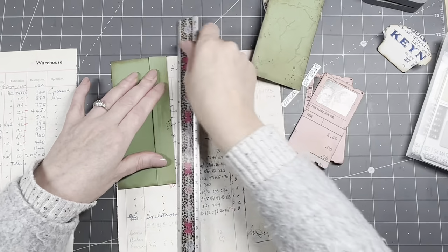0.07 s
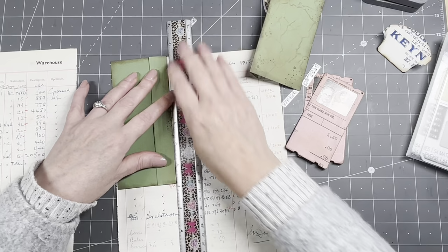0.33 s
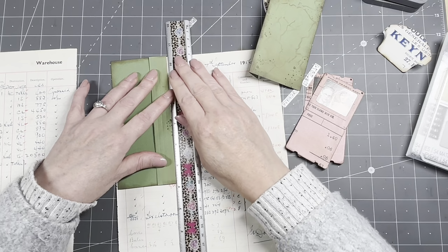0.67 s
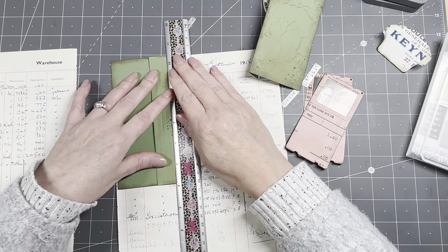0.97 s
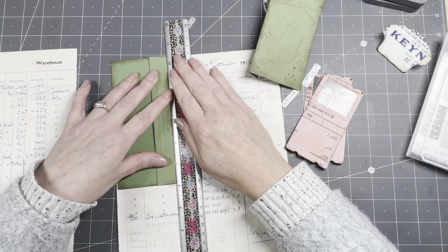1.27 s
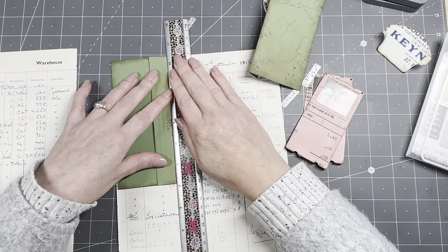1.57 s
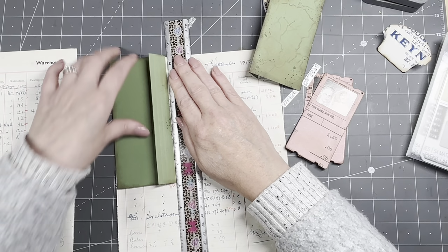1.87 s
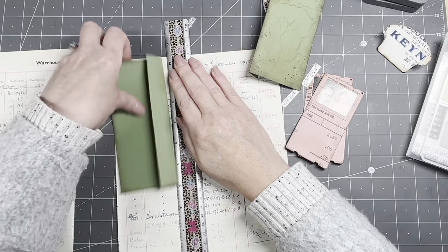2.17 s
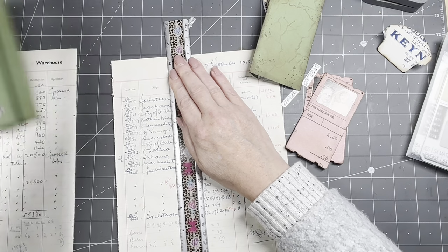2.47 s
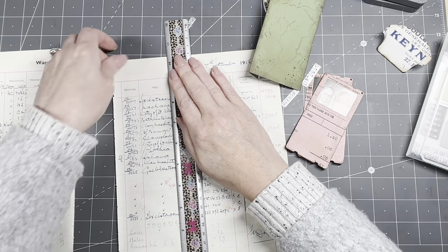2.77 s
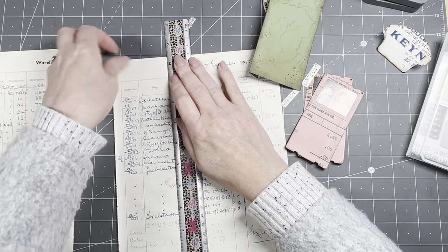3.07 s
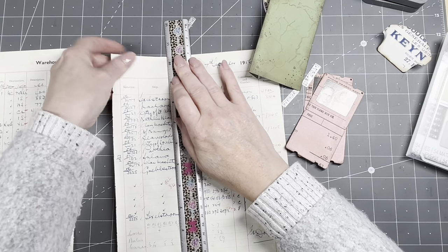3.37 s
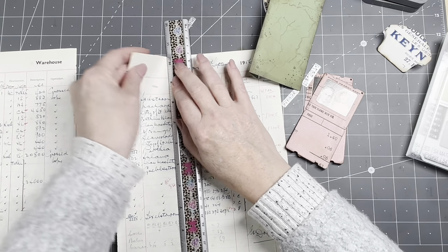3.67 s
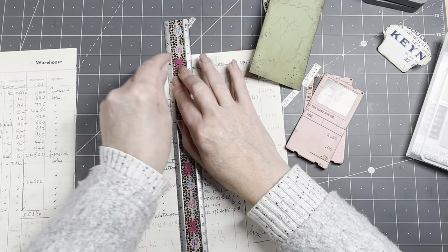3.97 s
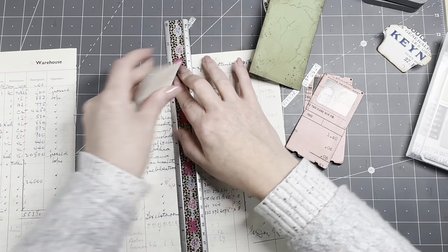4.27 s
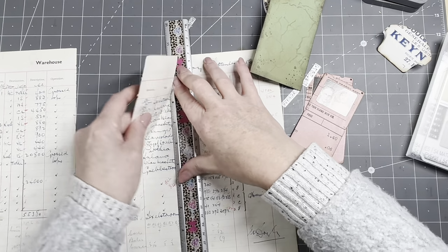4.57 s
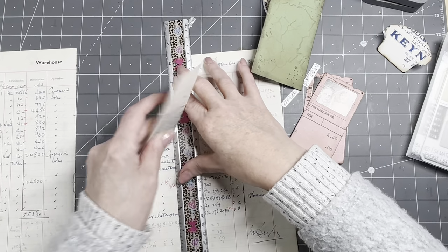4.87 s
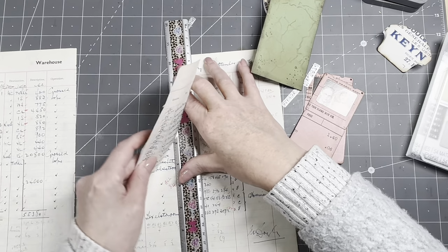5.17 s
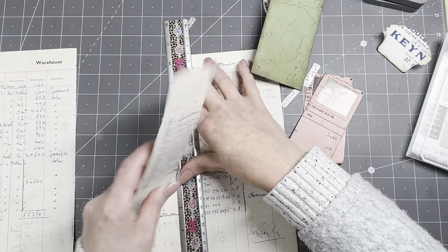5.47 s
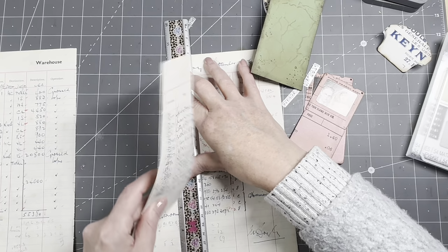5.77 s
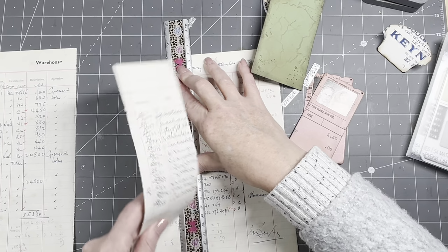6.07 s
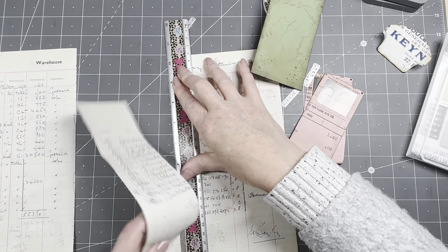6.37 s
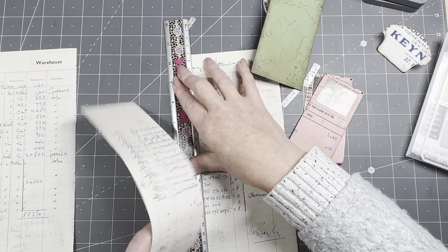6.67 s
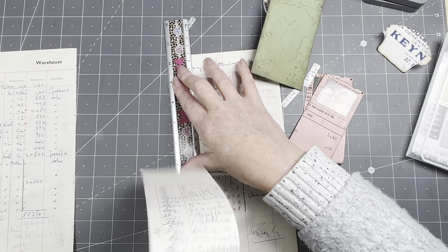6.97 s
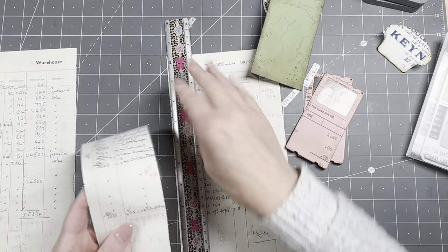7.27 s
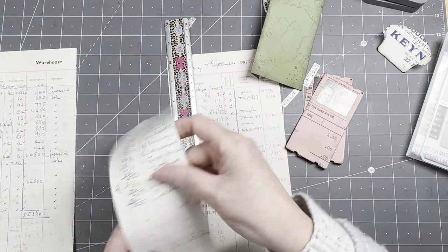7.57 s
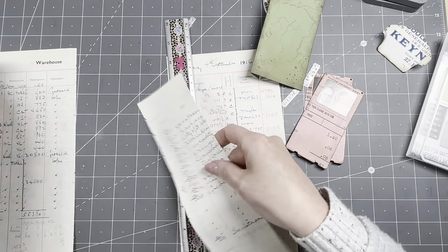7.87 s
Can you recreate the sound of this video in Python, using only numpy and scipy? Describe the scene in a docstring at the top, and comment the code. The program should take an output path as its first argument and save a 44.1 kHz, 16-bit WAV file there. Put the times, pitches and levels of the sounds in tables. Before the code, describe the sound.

Close above a craft desk in a quiet little room, a ruler lands on paper with a few sharp clacks. Light rubbing and dull bumps follow as a folder is moved aside. From about halfway, stiff paper rips in seven brief tugs, each a dense, fizzy crackle, with small snaps as the sheet buckles. It ends with the freed strip being handled: crinkles, tiny squeaks and light taps.

```python
"""A craft desk in a small, quiet room, heard through two close microphone ports above it.
A metal ruler is laid on old paper and a card folder is slid away: knocks, friction hiss, rustle.
A strip is torn off along the ruler in seven short pulls: fibres break in dense crackle,
the stiff sheet buckles with snaps and the desk drums. The strip is lifted and turned over."""
import sys
import numpy as np
from scipy import signal
from scipy.fft import rfft, irfft, next_fast_len
from scipy.io import wavfile
from scipy.ndimage import uniform_filter1d

SR = 44100
rng = np.random.default_rng(int(sys.argv[2]) if len(sys.argv) > 2 else 0)


def wav_out(sig):
    """Save sig, one row per channel (or a flat mono array), as 16-bit PCM at SR to the path in sys.argv[1]."""
    wavfile.write(sys.argv[1], SR, np.round(np.clip(np.atleast_2d(sig).T, -1, 1) * 32767).astype(np.int16))


N = 357651
TIME = np.arange(N) / SR
TAPS = 4096
HZ = np.fft.rfftfreq(TAPS, 1 / SR)


def amp(db):
    """Decibels to gain."""
    return 10 ** (np.asarray(db) / 20)


def decay(t, t60_s):
    """Gain falling 60 dB per t60_s."""
    return amp(-60 * t / t60_s)


def unit(x):
    """Scale to rms 1."""
    return x / np.sqrt(np.mean(x ** 2) + 1e-20)


def struck(x, span_s):
    """Scale a blow to the energy of rms 1 held for span_s."""
    return x / np.sqrt(np.sum(x ** 2) / (span_s * SR) + 1e-20)


def curve(points, hz=HZ):
    """Interpolate (frequency, value) points on a log-frequency axis."""
    point_hz, value = np.transpose(points)
    return np.interp(np.log(hz + 1), np.log(point_hz + 1), value)


def hump_db(centre_hz, db_per_octave):
    """Spectrum falling away on both sides of centre_hz."""
    return -db_per_octave * abs(np.log2((HZ + 1) / centre_hz))


def add(mix, start_s, sound):
    """Mix a sound in at start_s."""
    part = mix[max(round(start_s * SR), 0):][:len(sound)]
    part += sound[:len(part)]


def colour(x, shape_db):
    """Minimum-phase filter: rings after a click, never before."""
    log_gain = np.log(amp(np.maximum(shape_db, -100)))
    mirrored = np.concatenate([log_gain, log_gain[-2:0:-1]])
    spectrum = np.exp(np.conj(signal.hilbert(mirrored)))[:len(HZ)]
    return signal.oaconvolve(x, irfft(spectrum))[:len(x)]


def wander(rate_hz):
    """Smooth noise up to about rate_hz, rms 1."""
    hz = np.fft.rfftfreq(N, 1 / SR)
    return unit(irfft(rfft(rng.standard_normal(N)) / (1 + (hz / rate_hz) ** 4), N))


def crackle(per_s, spread_db):
    """Randomly timed clicks, mostly small, a few large."""
    size = amp(spread_db * np.minimum(rng.exponential(1, N), 4))
    polarity = rng.choice([-1., 1.], N)
    return unit(size * polarity * (rng.random(N) < per_s / SR))


def burst(t, t60_s, shape_db):
    """Dying cluster of contacts, coloured by what it strikes."""
    return colour(rng.standard_normal(len(t)) * decay(t, t60_s), shape_db)


def flexing(x, depth_db, hold_s):
    """Shifting resonances of a bending sheet; output rms 1."""
    _, frame_s, spectra = signal.stft(x, SR, nperseg=512, noverlap=384)
    hold_frames = max(int(hold_s / frame_s[1]), 1)
    ripple = uniform_filter1d(rng.standard_normal(spectra.shape), size=4, axis=0)
    ripple = unit(uniform_filter1d(ripple, hold_frames, axis=1))
    _, flexed = signal.istft(spectra * amp(depth_db * ripple), SR, nperseg=512, noverlap=384)
    return unit(flexed[:N])


def stroke(length_s, rise_s, t60_s, swell_db, bite=0):
    """Speed of a hand movement: rises from the fraction bite, swells or fades, runs out."""
    t = np.arange(0, length_s + t60_s, 1 / SR)
    rise = bite + (1 - bite) * np.minimum(t / rise_s, 1)
    swell = amp(swell_db * (np.minimum(t / length_s, 1) - .5))
    return rise * swell * decay(np.maximum(t - length_s, 0), t60_s)


# Room air spectrum: (frequency [Hz], gain [dB])
AIR_SPECTRUM = [(20, -21), (50, 4), (90, -4), (130, -10.5), (220, -13), (500, -22.5), (1200, -30.5),
                (2500, -32), (6000, -39), (15000, -48.5)]
# Each port's own air against the shared part: (frequency [Hz], gain [dB])
AIR_PER_PORT = [(100, -15), (500, -10), (3000, -3)]


def air(level_db=-70):
    """Low building murmur shared by both ports, and faint hiss that differs between them."""
    shared, left, right = rng.standard_normal((3, N))
    ports = [shared + colour(own, curve(AIR_PER_PORT)) for own in (left, right)]
    return amp(level_db) * unit(np.array([colour(port, curve(AIR_SPECTRUM)) for port in ports]))


# Room decay: (frequency [Hz], t60 [s])
ROOM_T60 = [(100, 0.27), (500, 0.37), (2000, 0.19), (6000, 0.23), (15000, 0.022)]


def room(x, level_db=-16, delay_s=0.008):
    """Short tail of the small room at one port."""
    t = np.arange(SR // 2) / SR
    hz, frame_s, spectra = signal.stft(rng.standard_normal(len(t)) * (t > delay_s), SR, nperseg=256)
    spectra *= decay(frame_s, curve(ROOM_T60, hz)[:, None])
    tail = signal.istft(spectra, SR, nperseg=256)[1][:len(t)]
    return amp(level_db) * signal.oaconvolve(x, tail / np.linalg.norm(tail))[:N]


# Near echo spectrum: (frequency [Hz], gain [dB])
ECHO_SPECTRUM = [(100, -15.5), (400, -4.5), (850, 2), (2000, -3), (4500, 3.5), (7500, -7), (15000, -25.5)]


def reflections(x, t60_s=0.028, delay_s=0.0004, hop=4096):
    """Changing echoes off moving hands, strip and desk things, plus their room tail."""
    t = np.arange(SR // 20) / SR
    window = np.sin(np.pi * np.arange(2 * hop) / (2 * hop))
    echoes = np.zeros(N)
    for start in range(0, N, hop):
        piece = x[start:start + 2 * hop]
        taps = rng.standard_normal(len(t)) * decay(t, t60_s) * (t > delay_s)
        taps /= np.linalg.norm(taps)
        add(echoes, start / SR, signal.fftconvolve(piece * window[:len(piece)], taps))
    return colour(echoes, curve(ECHO_SPECTRUM)) + room(echoes)


# Paper squeaks: (time [s], length [s], start pitch [Hz], end pitch [Hz], level [dB])
SQUEAKS = [(1.678, 0.043, 1390, 1220, -67), (2.503, 0.017, 1230, 1180, -52),
           (2.542, 0.032, 1250, 1210, -61), (7.523, 0.016, 740, 646, -56.5),
           (7.559, 0.027, 770, 590, -50.5), (7.687, 0.034, 870, 1100, -51.5)]


def squeaks(width_hz=600):
    """Paper sticks and slips, driving one gliding resonance of the sheet."""
    out = np.zeros(N)
    pole = np.exp(-np.pi * width_hz / SR)
    for start_s, length_s, start_hz, end_hz, level_db in SQUEAKS:
        hz = np.linspace(start_hz, end_hz, round(length_s * SR))
        carrier = np.exp(2j * np.pi * np.cumsum(hz) / SR)
        slips = rng.standard_normal(SR // 4)[:len(hz)]
        ring = (carrier * signal.lfilter([1], np.poly([pole, pole]), slips / carrier)).real
        add(out, start_s, amp(level_db) * unit(ring * signal.windows.tukey(len(hz), .5)))
    return out


# Desk top response: (frequency [Hz], gain [dB])
DESK_SPECTRUM = [(25, -43.5), (60, -5.5), (100, -8), (130, 3), (160, -9), (250, -10.5), (400, -16.5),
                 (900, -29), (3000, -64)]


def desk_rumble(drive):
    """Low response of the desk top to a force, rms 1."""
    return unit(colour(drive, curve(DESK_SPECTRUM)))


def desk_thump(t, mode_hz=130, mode_t60_s=0.12, thud_t60_s=0.16):
    """A blow excites the desk's lowest mode and a dull thud."""
    mode = unit(np.sin(2 * np.pi * mode_hz * t) * decay(t, mode_t60_s))
    thud = desk_rumble(rng.standard_normal(len(t)) * decay(t, thud_t60_s))
    return struck(mode + thud, span_s=0.028)


# How freely the strip hangs: (time [s], freedom [0-1])
STRIP_FREEDOM = [(4.0, 0.03), (4.7, 0.37), (5.3, 0.33), (6.0, 0.93)]


def strip(drive, held_db, free_db):
    """The strip's spectrum fades from held to free as it comes loose."""
    freedom = np.interp(TIME, *np.transpose(STRIP_FREEDOM))
    return (1 - freedom) * unit(colour(drive, held_db)) + freedom * unit(colour(drive, free_db))


# Hand, ruler, folder or strip on paper: (time [s], length [s], rustle [dB], hiss [dB], swell [dB])
RUB_STROKES = [(0.0, 0.049, -39.5, -45.5, -34.5), (0.051, 0.067, -48, -46.5, 3),
               (0.133, 0.018, -47.5, -41, 4.5), (0.153, 0.27, -74, -68, -25), (0.378, 0.036, -65, -63, -3),
               (0.637, 0.11, -86, -80, -3.5), (0.86, 0.14, -93.5, -86, 5), (1.562, 0.13, -81.5, -56, 12),
               (1.843, 0.15, -57, -59, -13.5), (1.994, 0.08, -85, -66.5, 0), (2.131, 0.1, -78, -48.5, -9),
               (2.097, 0.29, -61, -57, 1.5), (2.394, 0.027, -64, -53.5, 0), (2.464, 0.051, -62, -55.5, 1),
               (2.52, 0.036, -49, -54, -1), (2.74, 0.028, -80, -70, -2), (2.975, 0.04, -60, -63, 6),
               (3.139, 0.15, -66, -56.5, -6.5), (3.238, 0.018, -67, -39, 1), (3.313, 0.3, -66, -61, 7.5),
               (3.434, 0.024, -75, -48.5, -3), (3.565, 0.15, -68, -67, -10),
               (4.121, 0.32, -61.5, -62.5, 12), (4.453, 0.12, -72.5, -74, 5), (4.81, 0.15, -64.5, -65, 3),
               (4.902, 0.19, -62, -56.5, 1.5), (5.367, 0.24, -63, -62.5, 17), (5.77, 1.254, -62, -62.5, 1),
               (7.102, 0.085, -65, -59, 16), (7.197, 0.22, -64, -58, -10),
               (7.441, 0.078, -53.5, -50.5, 1.5), (7.553, 0.076, -53.5, -51, 3),
               (7.68, 0.17, -70.5, -73, -20), (7.827, 0.048, -63, -64, 11), (7.965, 0.096, -50.5, -56, 0.5)]


def rub_gains(sleeves_from_s=1.85, sleeves_db=(-79, -79.5), settle_db=-17.5, settle_t60_s=0.3):
    """Rustle and hiss gains: sleeves, rubs and the sheet settling after blows add in power."""
    rustle_power, hiss_power = (amp(db) ** 2 * (TIME > sleeves_from_s) for db in sleeves_db)
    for start_s, length_s, rustle_db, hiss_db, swell_db in RUB_STROKES:
        speed = stroke(length_s, rise_s=0.02, t60_s=0.11, swell_db=swell_db)
        add(rustle_power, start_s, (amp(rustle_db) * speed) ** 2)
        add(hiss_power, start_s, (amp(hiss_db) * speed) ** 2)
    settling = amp(settle_db) * decay(np.arange(SR // 3) / SR, settle_t60_s)
    for start_s, _, blow_db, *_ in DESK_KNOCKS + SHEET_SNAPS:
        add(rustle_power, start_s, (amp(blow_db) * settling) ** 2)
    return np.sqrt(rustle_power), np.sqrt(hiss_power)


# Paper rustle, its change on a free strip, friction hiss: (frequency [Hz], gain [dB])
RUSTLE_SPECTRUM = [(30, -15), (120, -7.5), (300, 0.5), (700, -1.5), (1200, -0.5), (2200, -0.5),
                   (3500, -1.5), (8000, -36.5)]
FREE_STRIP_EQ = [(150, -4.5), (300, -5), (600, 6.5), (1000, 0), (2000, 4.5), (4000, 0)]
HISS_SPECTRUM = [(500, -24.5), (2000, -12), (3600, -3), (5500, 1), (7500, 0), (10000, -4.5), (13000, 2),
                 (15500, -7)]


def rubbing(desk_db=-7, grip_db=2.1, tick_db=-9):
    """Paper on paper and skin: friction hiss, crinkles, stray ticks and desk rumble."""
    grip = unit(amp(grip_db * wander(rate_hz=34)))
    rustle_gain, hiss_gain = rub_gains()
    crinkles = crackle(per_s=1500, spread_db=3) + amp(tick_db) * crackle(per_s=40, spread_db=2.5)
    flat_db = curve(RUSTLE_SPECTRUM)
    rustle = strip(crinkles, held_db=flat_db, free_db=flat_db + curve(FREE_STRIP_EQ))
    rustle = flexing(rustle, depth_db=3.5, hold_s=0.051)
    friction = crackle(per_s=20000, spread_db=3.5) + 0.13 * crinkles
    hiss = unit(colour(friction, curve(HISS_SPECTRUM)))
    rumble = amp(desk_db) * desk_rumble(rng.standard_normal(N))
    return grip * (rustle_gain * (rustle + rumble) + hiss_gain * hiss)


# Crack spectrum: (frequency [Hz], gain [dB])
CRACK_SPECTRUM = [(300, -27), (1500, -19.5), (3800, 2), (5500, 1), (8000, -0.5), (12000, -1.5), (15500, -6)]


def crack(t, t60_s, shelf_db, shelf_hz=8000):
    """Bright onset of a knock or snap, with a treble shelf."""
    shelf = HZ ** 4 / (HZ ** 4 + shelf_hz ** 4)
    return struck(burst(t, t60_s, curve(CRACK_SPECTRUM) + shelf_db * shelf), span_s=0.0073)


# Ruler, folder, fingers and strip hit the desk:
# (time [s], centre [Hz], clack [dB], tick [dB], thump before trim [dB], tick shelf [dB])
DESK_KNOCKS = [(0.008, 1340, -38.5, -39, -41, -18), (0.131, 2950, -32, -24, -63, 14),
               (0.1336, 1900, -36.5, -32, -40, -4), (0.2385, 920, -50, -42.5, -51.5, 5),
               (0.3765, 1760, -65, -56, -57.5, 6.5), (0.6479, 2390, -66, -68.5, -84, 3),
               (1.847, 365, -56.5, -47.5, -53, -16), (1.859, 348, -47.5, -46.5, -41.5, -11),
               (1.926, 357, -44.5, -52.5, -42, -10), (1.9608, 356, -54, -55, -40, -27),
               (2.086, 4500, -47.5, -43.5, -50, -5), (2.179, 463, -52.5, -66, -85, 9),
               (2.497, 1100, -43.5, -42.5, -58, 11), (2.6849, 363, -48.5, -56, -51, -1),
               (2.798, 355, -55, -60.5, -54.5, -6), (2.903, 890, -52, -62, -60, -8),
               (3.132, 2000, -63, -49, -61, 33), (3.351, 1200, -57.5, -56.5, -68, -2),
               (3.501, 1210, -59, -65, -68, -10), (4.227, 494, -60, -75, -57, -1),
               (4.5661, 364, -42, -59, -66, 9), (4.985, 1300, -54, -64, -66, 1),
               (5.085, 1970, -58.5, -59, -56, 19), (6.823, 745, -39.5, -65, -44, -10),
               (7.455, 890, -55, -58, -63, 14), (7.5528, 3150, -43.5, -45, -53, 1),
               (7.652, 620, -55, -70, -76, -10), (7.9635, 2900, -39.5, -43.5, -53.5, -12),
               (7.9963, 1070, -40, -47, -47, -10), (8.045, 1240, -46, -51, -56, -15)]


def knocks(thump_trim_db=-1):
    """Flat things land on the cutting mat: damped clack, tick and desk thump."""
    out, t = np.zeros(N), np.arange(SR // 5) / SR
    for start_s, centre_hz, clack_db, tick_db, thump_db, shelf_db in DESK_KNOCKS:
        shape_db = curve(RUSTLE_SPECTRUM) + hump_db(centre_hz, db_per_octave=5)
        clack = amp(clack_db) * struck(burst(t, t60_s=0.043, shape_db=shape_db), span_s=0.01)
        tick = amp(tick_db) * crack(t, t60_s=0.031, shelf_db=shelf_db)
        thump = amp(thump_db + thump_trim_db) * desk_thump(t)
        add(out, start_s, clack + tick + thump)
    return out


# Radiating sheet: (frequency [Hz], gain [dB])
SHEET_SPECTRUM = [(30, -24.5), (100, -28.5), (200, -8.5), (330, -11), (600, 0.5), (850, -4.5), (1250, -0.5),
                  (2000, -2.5), (3000, -3.5), (4500, -22), (9000, -35.5)]
# The sheet buckles or a tough bundle gives way:
# (time [s], mid-glide pitch [Hz], ring [dB], crack [dB], crack shelf [dB])
SHEET_SNAPS = [(0.2027, 1590, -43.5, -55, -5), (0.214, 1600, -45, -53, 1), (2.8455, 975, -56.5, -36, 36),
               (3.8608, 1120, -43, -61, -29), (3.9168, 2100, -30, -27.5, -23),
               (4.3123, 1873, -54.5, -60, -7), (4.685, 1190, -43, -37, 28), (5.345, 1660, -45, -52, 0),
               (5.7357, 1760, -31.5, -30, -18.5), (5.8726, 2430, -44.5, -75, -11),
               (6.1014, 1450, -33, -52, 6), (6.247, 1020, -71, -51, 2), (6.342, 1320, -48.5, -48, 11),
               (6.421, 1360, -41, -61, 1), (6.667, 2010, -46, -66, -11), (6.7276, 2280, -48, -44, 0),
               (6.76, 2600, -37.5, -63, -4), (6.813, 1980, -41, -43, -7), (6.932, 2900, -56, -46.5, 0),
               (6.9881, 1530, -40.5, -56, -24), (7.565, 1130, -47, -51, 2), (7.6196, 650, -36.5, -38, -36),
               (7.629, 2110, -39, -55, -3)]


def snaps(ring_t60_s=0.0095, sag=0.16, sag_s=0.00095, thump_db=-23):
    """A paper patch flips: a crack and a short ring that sinks as the tension goes."""
    out, t = np.zeros(N), np.arange(SR // 5) / SR
    glide = 1 + sag * (2 * np.exp(-t / sag_s) - 1)
    for start_s, pitch_hz, ring_db, crack_db, shelf_db in SHEET_SNAPS:
        cycles = np.cumsum(pitch_hz * glide) / SR
        patch = unit(np.sin(2 * np.pi * cycles) * decay(t, ring_t60_s))
        shape_db = curve(SHEET_SPECTRUM) + hump_db(pitch_hz, db_per_octave=4)
        flutter = unit(burst(t, t60_s=0.019, shape_db=shape_db))
        ring = amp(ring_db) * struck(patch + 0.64 * flutter, span_s=0.014)
        onset = amp(crack_db) * crack(t, t60_s=0.0039, shelf_db=shelf_db)
        thump = amp(ring_db + thump_db) * desk_thump(t)
        add(out, start_s, ring + onset + thump)
    return out


# Pulls on the strip: (time [s], length [s], speed rise [s], speed t60 [s], speed swell [dB],
# sheet [dB], fizz [dB], desk before trim [dB])
TEAR_PULLS = [(3.905, 0.2, 0.099, 0.15, -1.5, -40, -39.5, -46),
              (4.581, 0.21, 0.053, 0.14, 2.5, -39.5, -43, -54), (5.133, 0.22, 0.066, 0.1, 4, -42, -43, -58),
              (5.625, 0.15, 0.12, 0.14, 1.5, -39, -42, -53),
              (5.993, 0.13, 0.073, 0.1, -0.5, -36.5, -40, -49),
              (6.34, 0.13, 0.032, 0.31, 0, -40, -42.5, -46),
              (6.712, 0.098, 0.012, 0.036, 5, -42.5, -40, -55)]


def pull_gains(bite=0.31, sheet_exponent=1.24, desk_exponent=1.3, desk_linger_s=0.24):
    """Pull speed drives sheet, fibres and desk; the sheet builds later, the desk dies slowly."""
    sheet, fizz, desk = np.zeros((3, N))
    for start_s, length_s, rise_s, t60_s, swell_db, sheet_db, fizz_db, desk_db in TEAR_PULLS:
        speed = stroke(length_s, rise_s, t60_s, swell_db, bite)
        tug = stroke(length_s, rise_s, t60_s + desk_linger_s, swell_db, bite)
        add(sheet, start_s, amp(sheet_db) * speed ** sheet_exponent)
        add(fizz, start_s, amp(fizz_db) * speed)
        add(desk, start_s, amp(desk_db) * tug ** desk_exponent)
    return sheet, fizz, desk


# Added body of a short, taut strip; fibre fizz: (frequency [Hz], gain [dB])
TAUT_STRIP_EQ = [(80, 20), (200, 11), (400, 7.5), (750, -6.5), (1200, 1), (2000, -1), (3000, -6),
                 (6000, 8.5)]
FIZZ_SPECTRUM = [(300, -18.5), (1500, -13), (3000, -8.5), (4200, -3), (5600, -3), (7500, 0), (10000, -5.5),
                 (13000, 0.5), (15500, -5)]


def tear(catch_db=1.18, desk_trim_db=-1):
    """The tear catches and runs: breaking bundles shake the sheet, single fibres fizz."""
    catching = unit(amp(catch_db * wander(rate_hz=490)))
    bundles = catching * crackle(per_s=3200, spread_db=2.5)
    fibres = unit(catching * crackle(per_s=9800, spread_db=3.5) + 0.45 * bundles)
    sheet_db = curve(SHEET_SPECTRUM)
    sheet = strip(bundles, held_db=sheet_db + curve(TAUT_STRIP_EQ), free_db=sheet_db)
    sheet = flexing(sheet, depth_db=0.5, hold_s=0.11)
    fizz = flexing(colour(fibres, curve(FIZZ_SPECTRUM)), depth_db=3.5, hold_s=0.016)
    drumming = amp(desk_trim_db) * desk_rumble(bundles)  # driven through the ruler
    sheet_gain, fizz_gain, desk_gain = pull_gains()
    return sheet_gain * sheet + fizz_gain * fizz + desk_gain * drumming


# Ruler and sheet on the cutting mat: (centre [Hz], width [Hz], gain [dB])
MAT_RESONANCES = [(134.6, 3.4, 3.5), (407, 63, 5), (626, 6.1, 0.5), (1120, 46, 2.5), (1410, 56, 0),
                  (1860, 35, -3), (2043, 72, 0), (4130, 1900, 1), (8040, 1200, 1.5)]


def scene(level_db=-2):
    """All desk sounds share the resonances and reach each port directly and by reflection."""
    peaks_db = sum(db / (1 + (2 * (HZ - hz) / width_hz) ** 2) for hz, width_hz, db in MAT_RESONANCES)
    sources = tear() + rubbing() + snaps() + knocks() + squeaks()
    direct = amp(level_db) * colour(sources, peaks_db)
    return np.array([direct + reflections(direct) for _ in range(2)]) + air()


# Phase between ports: (frequency [Hz], left lead [rad])
LEFT_LEAD = [(0, 0), (900, .3), (2000, 1.4), (3700, 3), (5600, 3.3), (6500, .3), (7600, 0), (9900, -3.1),
             (12800, -6.3), (15600, -9.4)]
# Level between ports: (frequency [Hz], left minus right [dB])
LEFT_EXCESS = [(100, 0.5), (350, -1), (900, 4.5), (1400, 1.5), (2700, 0), (4100, 5.5), (5500, 6),
               (6500, -0.5), (8000, 0)]


def record(dry, low_cut_hz=40, high_cut_hz=15850):
    """Two microphone ports, differing in phase and level, band-limited."""
    size = next_fast_len(N + TAPS)
    hz = np.fft.rfftfreq(size, 1 / SR)
    left = amp(curve(LEFT_EXCESS, hz) / 2) * np.exp(.5j * curve(LEFT_LEAD, hz))
    highpass = 1j * hz / (1j * hz + low_cut_hz)
    ports = irfft(rfft(dry, size) * highpass * np.array([left, 1 / left]), size)[:, :N]
    lowpass = signal.firwin(511, high_cut_hz, window=("kaiser", 9), fs=SR)
    return signal.oaconvolve(ports, lowpass[None], "same")


dry = scene()
out = record(dry)
wav_out(out)
```